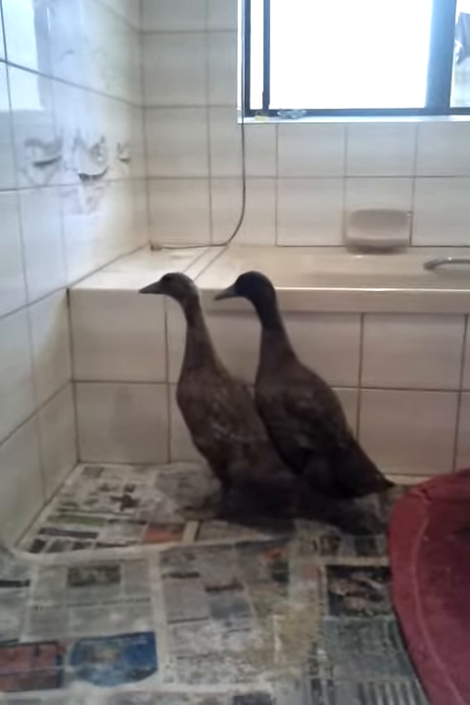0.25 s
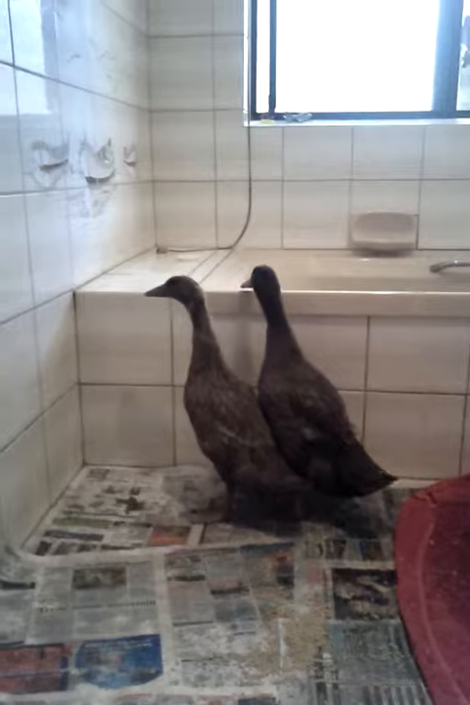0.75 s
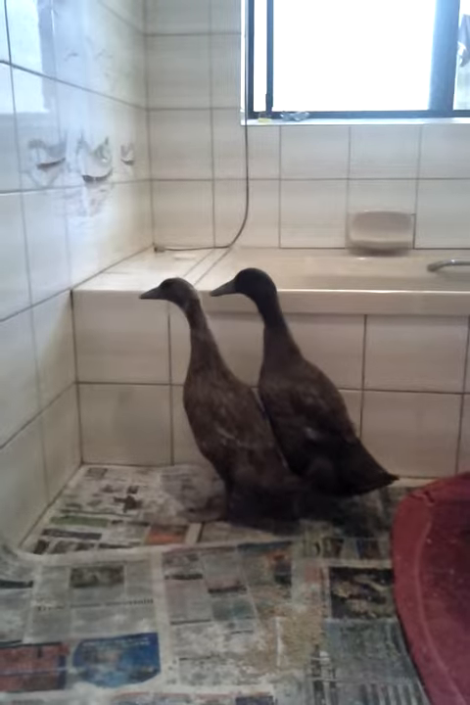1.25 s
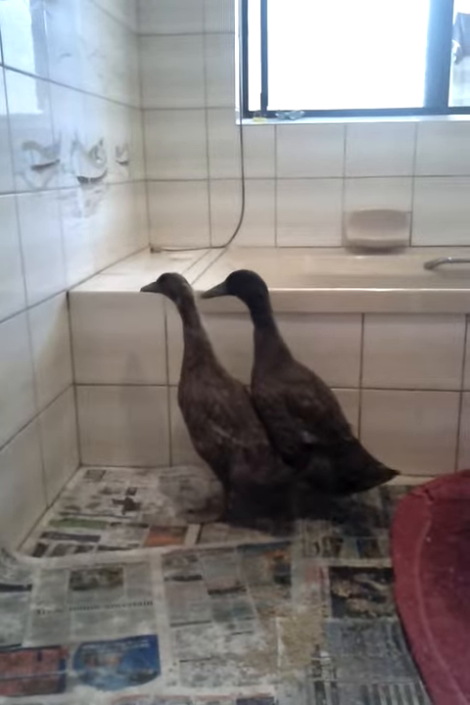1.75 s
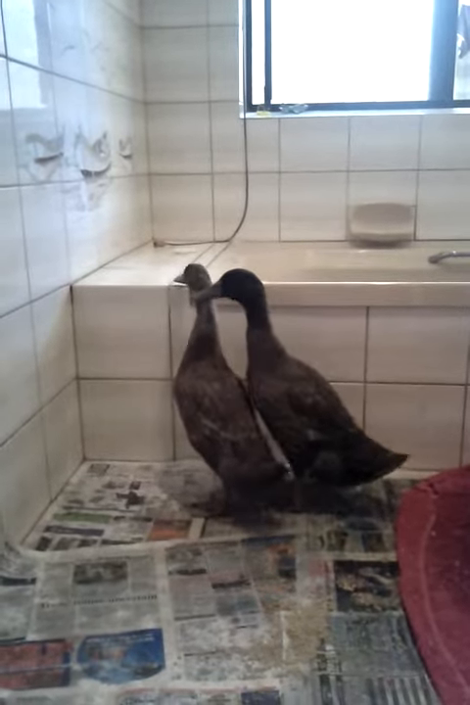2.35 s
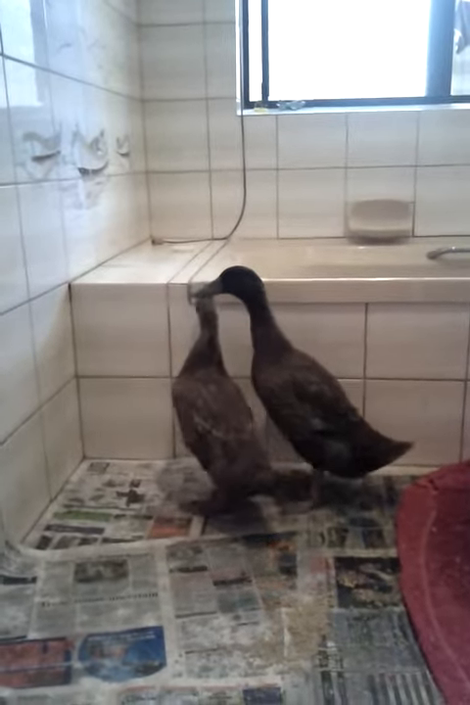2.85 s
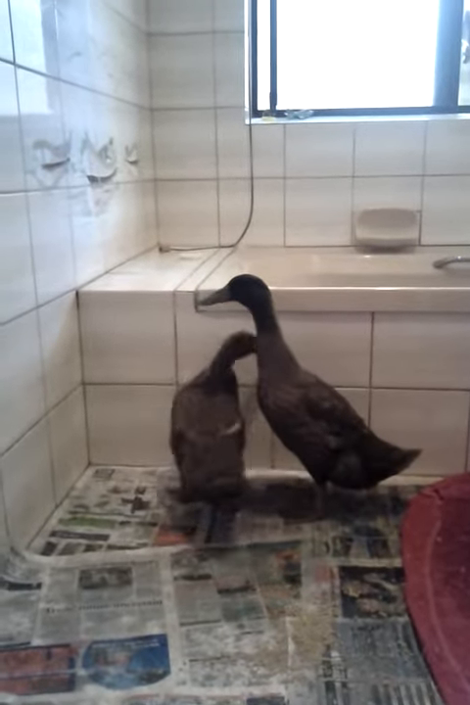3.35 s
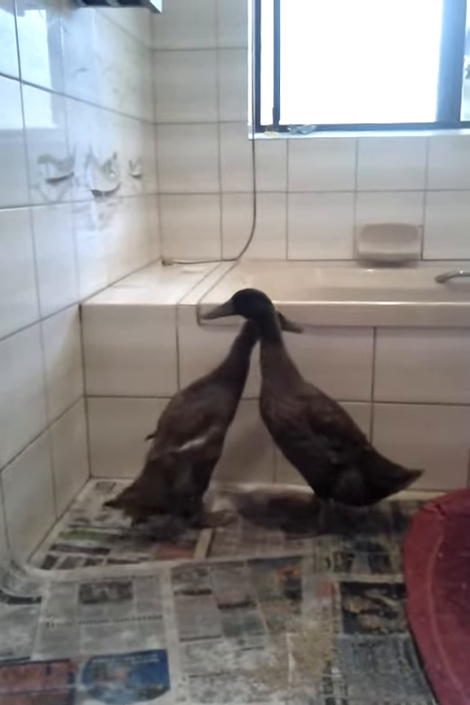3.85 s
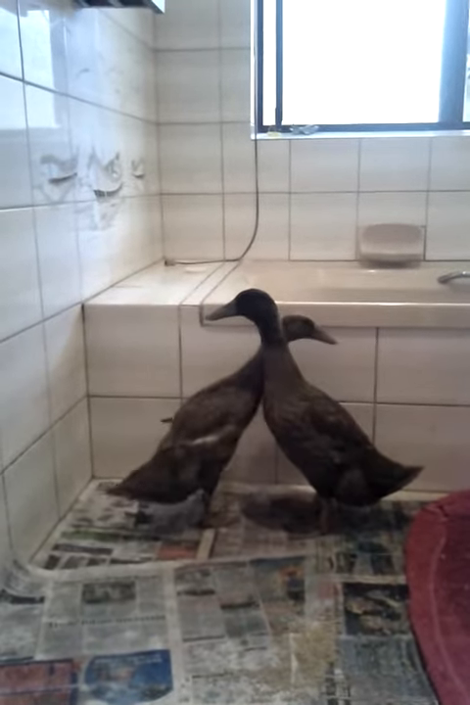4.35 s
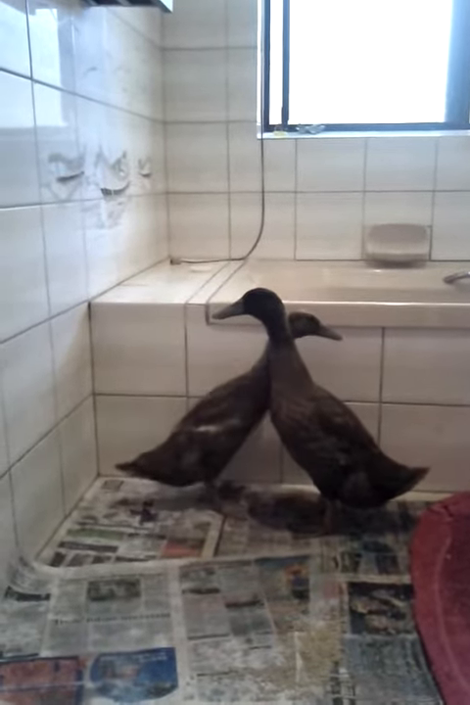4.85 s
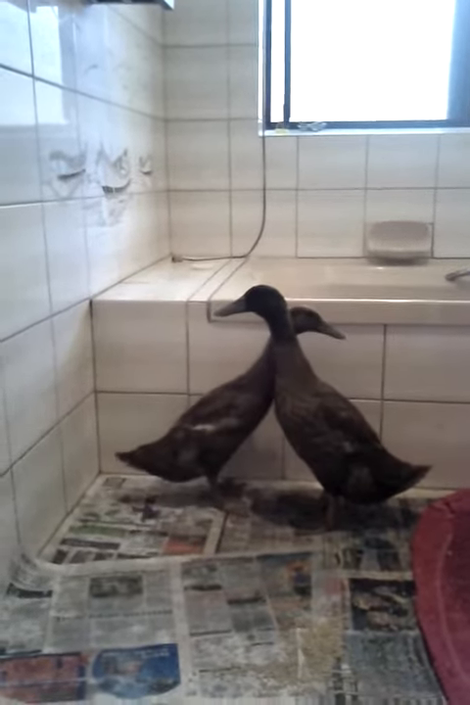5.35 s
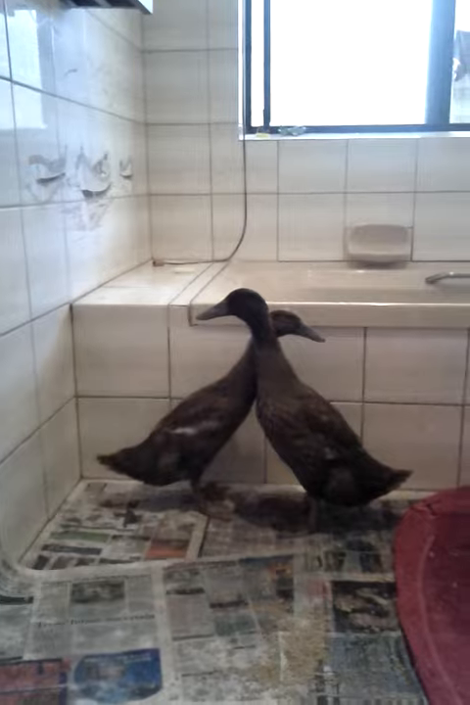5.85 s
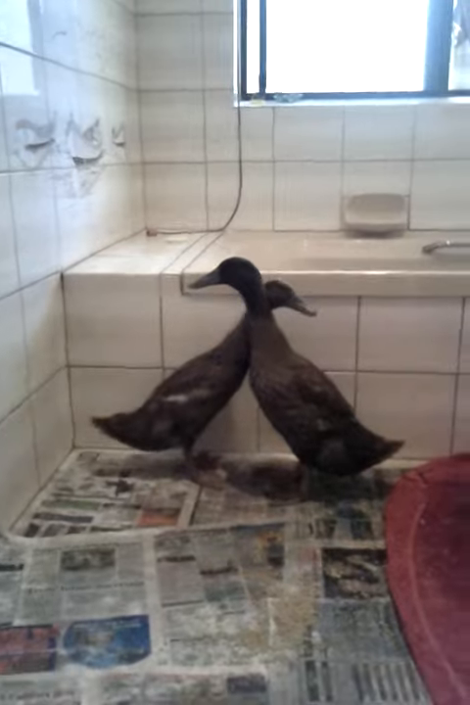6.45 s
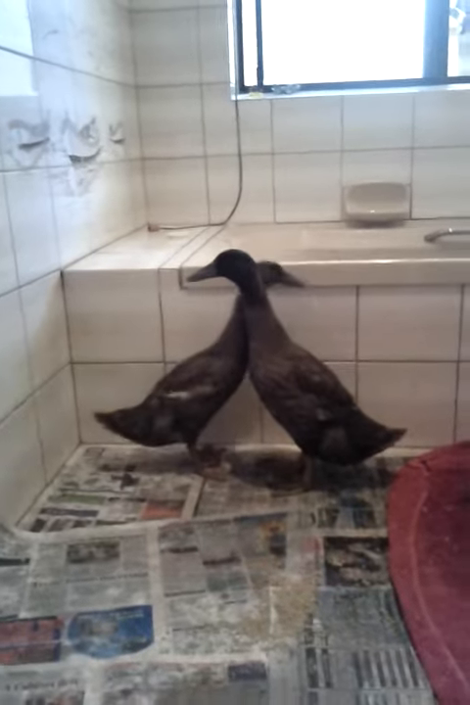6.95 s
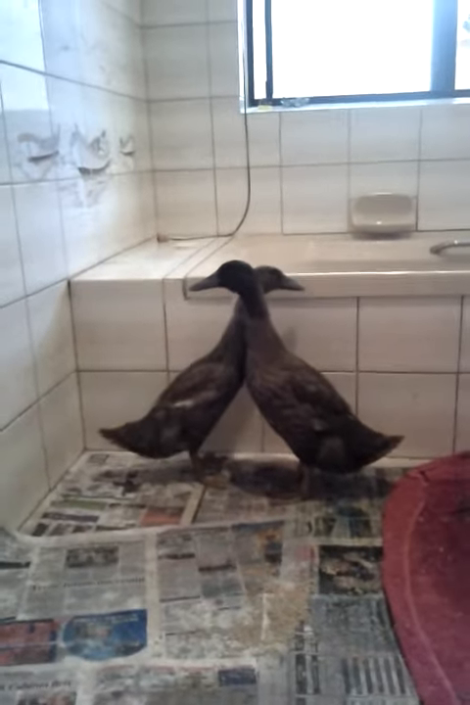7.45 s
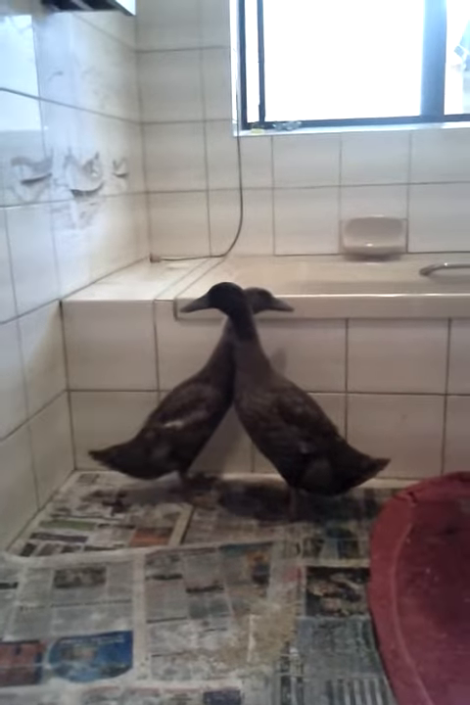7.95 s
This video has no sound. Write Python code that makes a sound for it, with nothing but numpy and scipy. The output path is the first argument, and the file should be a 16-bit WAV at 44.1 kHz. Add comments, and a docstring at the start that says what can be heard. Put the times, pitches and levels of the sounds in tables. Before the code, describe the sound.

In a small tiled bathroom, a duck gives two runs of loud raspy quacks, with webbed feet patting and scuffing on newspaper between.

```python
"""Two ducks on newspaper in a small tiled bathroom, over a dull hush with an uneven low rumble.
Feet (noise through a paper response) pat and scuff first. Then one duck gives a run of loud, raspy
quacks: a pulse train and breath noise through throat, windpipe and bill resonances. Feet pat and scuff
again, the rumble swells, and a second run of quacks follows. Tiles ring after quacks and steps
(decaying noise, standing waves); the loudest quacks overload a narrow-band microphone."""
import sys
import numpy as np
from scipy import signal
from scipy.fft import rfft, irfft, next_fast_len
from scipy.io import wavfile
from scipy.ndimage import map_coordinates

SR = 44100
rng = np.random.default_rng(int(sys.argv[2]) if len(sys.argv) > 2 else 0)


def digitize_waveform(pressure):
    """Quantize a signal to 16-bit integers and store it at the path in sys.argv[1].

    Rows of a 2-D input are taken as channels; values are limited to [-1, 1].
    """
    field = np.atleast_2d(pressure).T
    bounded = np.clip(field, -1, 1)
    quanta = np.round(bounded * 32767).astype(np.int16)
    wavfile.write(sys.argv[1], SR, quanta)


N = 361682


def amp(db):
    """Decibels to gain."""
    return 10 ** (np.asarray(db) / 20)


def unit(x):
    """Scale to rms 1."""
    return x / np.sqrt(np.mean(x ** 2) + 1e-20)


def along(points, f_hz):
    """Read (f/Hz, value) points on a log frequency axis."""
    knots_hz, values = np.transpose(points)
    return np.interp(np.log(f_hz + 1), np.log(knots_hz), values)


def wobble(rate_hz, size):
    """Smooth random curve, rate_hz knots a second."""
    knots = rng.standard_normal(SR // 20)
    return map_coordinates(knots, [np.arange(size) * rate_hz / SR], mode="wrap")


def filtered(x, response):
    """Multiply the spectrum of x by a response of frequency."""
    m = next_fast_len(len(x) + SR // 10)
    f_hz = np.fft.rfftfreq(m, 1 / SR)
    return irfft(rfft(x, m) * response(f_hz), m)[:len(x)]


def resonance(f, center_hz, width_hz):
    """Causal response of one resonance, gain 1 at its center."""
    damping = 1j * f * width_hz
    return damping / (center_hz * center_hz - f * f + damping)


def add(track, t_s, sound):
    """Mix a sound into the track at t_s."""
    part = track[round(t_s * SR):][:len(sound)]
    part += sound[:len(part)]


# hush spectrum: f/Hz, level/dB per Hz
HUSH_SPECTRUM = [(15, -52), (25, -28.5), (37, -22.5), (70, -5), (117, -5.5), (148, -11), (241, -0.5),
                 (291, -8), (385, -5.5), (547, -7), (894, -6.5), (2810, -21.5), (6680, -24), (8680, -66.5),
                 (14700, -120)]
# hush level: t/s, level/dB
HUSH_LEVEL = [(0, -51), (1.9, -50.5), (4, -49), (5, -48), (6, -46.5), (8.2, -47.5)]
# low rumble level: t/s, level/dB
RUMBLE_LEVEL = [(0, -63), (3.8, -74), (4.35, -50), (5.05, -66), (5.15, -48), (5.45, -57), (5.85, -52),
                (8.2, -59)]


def background(drift_db=1.0, lumps_db=2):
    """Shaped noise as a dull, nearly steady hush; resonant noise as an uneven rumble under it."""
    t = np.arange(N) / SR
    hush_db = np.interp(t, *np.transpose(HUSH_LEVEL)) + drift_db * wobble(5, N)
    rumble_db = np.interp(t, *np.transpose(RUMBLE_LEVEL)) + lumps_db * wobble(7.6, N)
    hush = unit(filtered(rng.standard_normal(N), lambda f: amp(along(HUSH_SPECTRUM, f))))
    rumble = unit(filtered(rng.standard_normal(N), lambda f: resonance(f, 88, 44) ** 2))
    return hush * amp(hush_db) + rumble * amp(rumble_db)


# newspaper spectrum: f/Hz, level/dB per Hz
PAPER_SPECTRUM = [(700, -22), (1800, -13.5), (3000, -10.5), (4500, -9), (5800, -4), (6800, -7)]


def paper_noise(n):
    """Noise with the spectrum of handled newspaper."""
    return filtered(rng.standard_normal(n), lambda f: amp(along(PAPER_SPECTRUM, f)))


# foot pats: t/s, onset level/dB before room gain, ring f/Hz
FOOT_PATS = [(1.514, -42.5, 5770), (1.556, -39, 3700), (1.665, -34, 5640), (3.52, -34, 4670),
             (3.775, -37, 5820), (4.581, -39, 5840), (4.593, -36, 3120), (4.837, -45, 5390),
             (4.915, -43.5, 6100)]
# foot scuffs: t/s, length/s, level/dB before room gain
FOOT_SCUFFS = [(1.533, .12, -64), (3.619, 0.25, -51), (4.343, 0.17, -53.5), (4.567, 0.055, -44.5),
               (4.741, .14, -55.5), (4.903, .044, -44)]
PAT_T60_S = 0.034


def feet(grain_db=5, ring_width_hz=600, ring_db=12.5):
    """Webbed feet pat the paper (decaying, ringing noise) and drag over it (clumped crackle)."""
    track = np.zeros(N)
    t = np.arange(SR // 10) / SR
    for t_s, level_db, ring_hz in FOOT_PATS:
        ringing = lambda f: 1 + amp(ring_db) * resonance(f, ring_hz, ring_width_hz)
        tick = unit(filtered(paper_noise(len(t)), ringing))
        add(track, t_s, amp(level_db - 60 * t / PAT_T60_S) * tick)
    for t_s, length_s, level_db in FOOT_SCUFFS:
        n = int(length_s * SR)
        crackle = paper_noise(n) * amp(grain_db * wobble(180, n))
        add(track, t_s, amp(level_db) * unit(crackle * np.hanning(n)))
    return track


RELEASE = 0.6  # share of call length
START_DB, HOLD_DB, END_DB = -18.5, -1.5, -11.5  # start and end relative to hold


def effort(u, attack):
    """Air pressure in dB through a call (u = 0..1): it swells, holds and gives out."""
    swell = np.maximum(1 - u / attack, 0)
    fade = np.maximum(1 - (1 - u) / RELEASE, 0)
    return HOLD_DB + START_DB * swell ** 3 + END_DB * fade ** 3


def syrinx(phase, rough):
    """One snap a cycle, with a puff of air that takes over toward the treble."""
    harmonics = np.arange(2, 36)[:, None]  # fundamental is added as hum
    snaps = unit(np.cos(harmonics * phase).sum(axis=0))
    air = unit(rng.standard_normal(len(phase)) * np.exp(np.cos(phase)))
    air_share = lambda f: np.clip(rough * np.sqrt(f / 1500), 0, .95)
    snaps = filtered(snaps, lambda f: np.sqrt(1 - air_share(f)))
    return snaps + filtered(air, lambda f: np.sqrt(air_share(f)))


# throat response at BILL_REF_HZ: f/Hz, level/dB per Hz
THROAT_RESPONSE = [(220, -55.5), (380, -14.5), (551, -14), (668, -13.5), (839, -15.5), (934, -13.5),
                   (1230, -7.5), (1440, -9.5), (1850, -1.5), (2320, -11), (2950, -25), (3540, -19.5),
                   (4340, -16), (5650, -15), (6680, -19.5), (8680, -55.5), (14700, -120)]
# windpipe resonances: f/Hz, width/Hz, level/dB before the rasp-dependent gain
WINDPIPE_MODES = [(4414, 170, -5), (5677, 370, -1)]
BILL_REF_HZ = 1890


def throat(f, bill_hz, ring_db):
    """Gain of throat and windpipe: opening the bill slides the main hump up, the windpipe stays."""
    slide_share = np.interp(f, [700, 1400, 2800, 4000], [0, 1, 1, 0])
    slide = (BILL_REF_HZ / bill_hz) ** slide_share
    windpipe = sum(amp(level_db + ring_db) * resonance(f, center_hz, width_hz)
                   for center_hz, width_hz, level_db in WINDPIPE_MODES)
    return amp(along(THROAT_RESPONSE, f * slide)) * (1 + windpipe)


# pitch knots, shares of call length: starts to glide, is held, starts to fall, has fallen
GLIDE_KNOTS = [.06, .28, .66, .97]


def quack(length_s, attack, glide_hz, rough, bill_hz, rasp_db, hum_db, half_shut=1.2, bright=0.35,
          flutter_db=3.0, honk_db=-10, honk_width_hz=750, octave_db=-1, ring=.8):
    """One call: a hoarse start through a half-shut bill, a held honk and a fading end."""
    u = np.linspace(0, 1, int(length_s * SR))
    n = len(u)
    effort_db = effort(u, attack)
    # cycles least regular at low air pressure
    jitter = (.015 + .035 * rough) * (1 - effort_db / 14)
    pitch_hz = np.interp(u, GLIDE_KNOTS, glide_hz) * (1 + jitter * wobble(219.5, n))
    phase = 2 * np.pi * np.cumsum(pitch_hz) / SR
    drive = amp(effort_db + flutter_db * wobble(196.7, n))

    # more rasp rings the windpipe harder
    tract = lambda f: throat(f, bill_hz, ring * rasp_db)
    muffled = lambda f: tract(f) / np.hypot(1, (f / (half_shut * bill_hz)) ** 2)
    shut = unit(filtered(drive * syrinx(phase, 2 * rough), muffled))
    # wide bill sharpens the main hump into a honk, narrow flattens it
    gape = np.interp(bill_hz, [1600, BILL_REF_HZ], [-1, 1])
    honk = lambda f: tract(f) * (1 + gape * amp(honk_db) * resonance(f, bill_hz, honk_width_hz))
    wide = unit(filtered(drive * syrinx(phase, rough), honk))
    opening = np.interp(u, [.05, .22], [0, 1])
    voice = (1 - opening) * shut + opening * wide

    # rasp: the band above 3200 Hz, grows with effort
    rasp = filtered(voice, lambda f: 1 / (1 + (3200 / (f + 1)) ** 10))
    body = voice - rasp
    # clear fundamental; the smoother the call, the more octave
    clear = np.sin(phase) + (1 - rough) * amp(octave_db) * np.sin(2 * phase)
    hum = unit(clear * amp(.5 * effort_db + 0.61 * flutter_db * wobble(150, n)))
    sound = body + rasp * amp(rasp_db + bright * effort_db) + amp(hum_db) * hum
    return sound * signal.windows.tukey(n, .04)


# soft notes and croaks before a quack: t/s, pitch f/Hz, level/dB before room gain, roughness 0-1
LEAD_IN_NOTES = [(2.058, 275.8, -25, .3), (2.292, 274.5, -23.5, .2), (2.846, 199.8, -23.5, .7),
                 (3.171, 209, -25, .9)]
LEAD_S, LEAD_BILL_HZ, LEAD_RASP_DB, LEAD_HUM_DB = 0.067, 1690, -6, -12
# quacks: t/s, length/s, held pitch f/Hz, level/dB before room gain, roughness 0-1, bill f/Hz
QUACK_CALLS = [ (2.088, 0.089, 237.3, -15, .4, 1580), (2.336, 0.098, 261.5, -11.5, .37, 1887),
               (2.541, .156, 281.2, -11, .45, 1922), (2.883, 0.12, 281.3, -10, .5, 1945),
               (3.209, .118, 301, -9, 0.29, 2174), (6.178, .14, 262.4, -16.5, .42, 1704),
               (6.484, 0.14, 260.2, -12.5, 0.38, 1876), (6.81, 0.13, 272.7, -10, .5, 1946),
               (7.193, .15, 266.8, -11, .65, 1904), (7.534, 0.15, 281.4, -10.5, .55, 1885),
               (7.968, .15, 266.9, -12, 0.49, 1940)]
SLACK_HZ, END_HZ = 203.04, 236  # start pitch out of silence; end pitch of every quack
COLD_ATTACK, WARM_ATTACK = 0.41, .3  # shares of length: out of silence; lead-in or after one
FULL_DB = -11.5  # full-throated from this level up
FULL_RASP_DB, RASP_DB_PER_DB = 1.53, 3  # full quack; lost per dB of softness
FULL_HUM_DB, HUM_DB_PER_DB = -13.5, 0.87  # full quack; gained per dB of softness


def duck():
    """Lead-ins hold one pitch; quacks scoop up unless led in, then sag; softer ones rasp less, hum more."""
    track = np.zeros(N)
    for t_s, pitch_hz, level_db, rough in LEAD_IN_NOTES:
        glide_hz = [pitch_hz] * len(GLIDE_KNOTS)
        note = quack(LEAD_S, WARM_ATTACK, glide_hz, rough, LEAD_BILL_HZ, LEAD_RASP_DB, LEAD_HUM_DB)
        add(track, t_s, amp(level_db) * note)
    for t_s, length_s, pitch_hz, level_db, rough, bill_hz in QUACK_CALLS:
        led_in = any(0 < t_s - lead[0] < 2 * LEAD_S for lead in LEAD_IN_NOTES)
        open_hz, attack = (pitch_hz, WARM_ATTACK) if led_in else (SLACK_HZ, COLD_ATTACK)
        glide_hz = [open_hz, pitch_hz, pitch_hz, END_HZ]
        soft_db = max(FULL_DB - level_db, 0)
        rasp_db = FULL_RASP_DB - RASP_DB_PER_DB * soft_db
        hum_db = FULL_HUM_DB + HUM_DB_PER_DB * soft_db
        call = quack(length_s, attack, glide_hz, rough, bill_hz, rasp_db, hum_db)
        add(track, t_s, amp(level_db) * call)
    return track


# decay time of the tile echo: f/Hz, t60/s
TILE_T60 = [(400, 0.55), (1000, 0.51), (2000, 0.5), (4000, .48), (7000, 0.38)]
# standing waves of the room: f/Hz, width/Hz, level/dB before wet gain
ROOM_MODES = [(175, 17, 2), (232, 5.2, -3), (244.1, 5.5, 5.5), (260.3, 4.8, 0), (277.4, 4.2, -4.5),
              (283, 4.8, -16)]


def bathroom(x, direct_db, wet_db, dense_hz=400, count=20):
    """Close tiled walls: a dense echo, its random pattern redrawn block by block, and low standing waves."""
    echo = np.zeros(N)
    for block in np.array_split(np.arange(N), count):
        f_hz, t, z = signal.stft(rng.standard_normal(SR * 2 // 3), SR, nperseg=256)
        decay_db = -60 * t / along(TILE_T60, f_hz)[:, None]
        tail = signal.istft(z * amp(decay_db), SR, nperseg=256)[1]
        tail = tail / np.linalg.norm(tail)
        add(echo, block[0] / SR + 0.0022, signal.fftconvolve(x[block], tail))
    dense = filtered(echo, lambda f: f ** 4 / np.hypot(f ** 4, dense_hz ** 4))
    modes = lambda f: sum(amp(level_db) * resonance(f, center_hz, width_hz)
                          for center_hz, width_hz, level_db in ROOM_MODES)
    waves = filtered(x, modes)
    return amp(direct_db) * x + amp(wet_db) * (dense + waves)


def scene():
    """Background, feet and duck at one microphone."""
    steps = bathroom(feet(), direct_db=4.5, wet_db=7.0)
    quacks = bathroom(duck(), direct_db=-9.5, wet_db=-1)
    return (background() + steps + quacks)[None]


BAND_HZ, TOP_HZ = 6880, 15870  # low-pass before and after clipping


def record(dry, headroom=0.8, low_hz=48):
    """The microphone rounds loud peaks; a narrow-band input thins deep bass and clips overshoots."""
    rounded = dry[0] / (1 + (dry[0] / headroom) ** 6) ** (1 / 6)
    band = filtered(rounded, lambda f: (f < BAND_HZ) * f ** 2 / np.hypot(f ** 2, low_hz ** 2))
    clipped = np.clip(band, -.72, .72)
    return filtered(clipped, lambda f: f < TOP_HZ)[None]


dry = scene()
out = record(dry)
digitize_waveform(out)
```